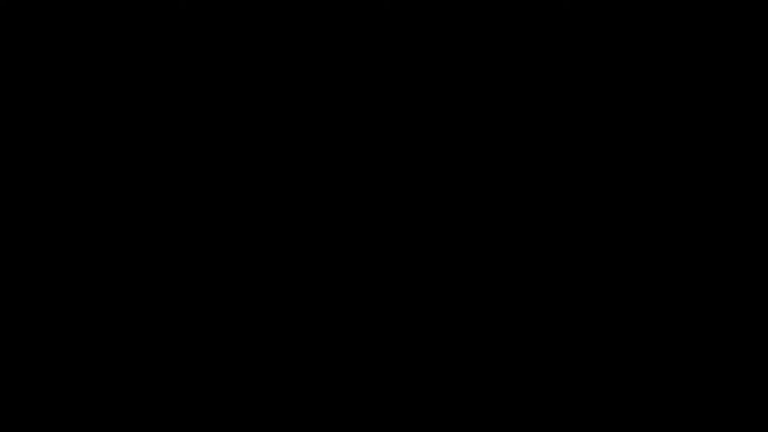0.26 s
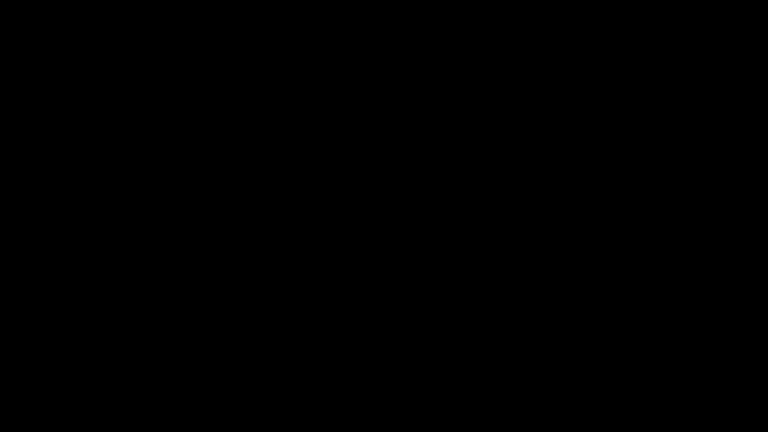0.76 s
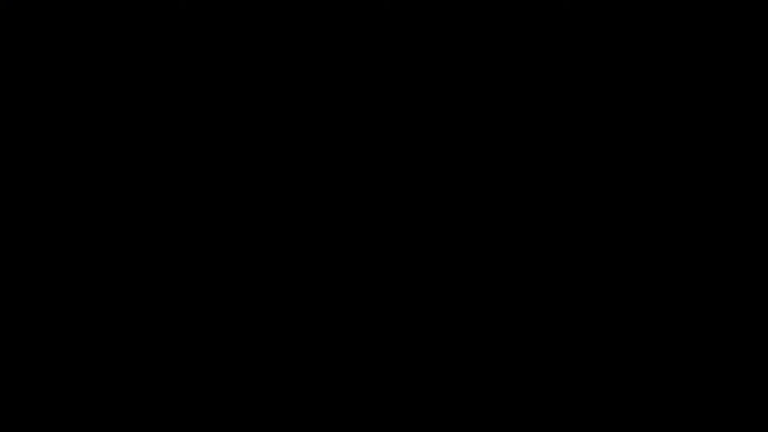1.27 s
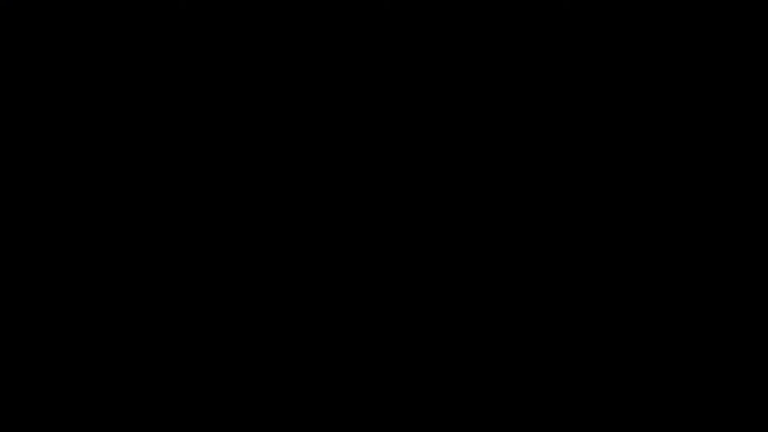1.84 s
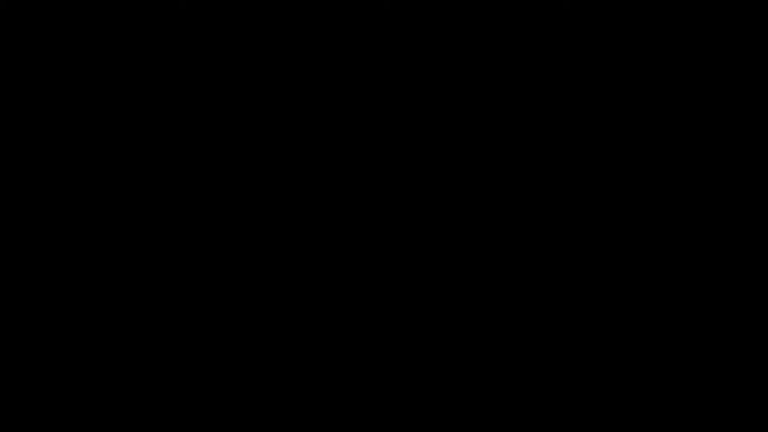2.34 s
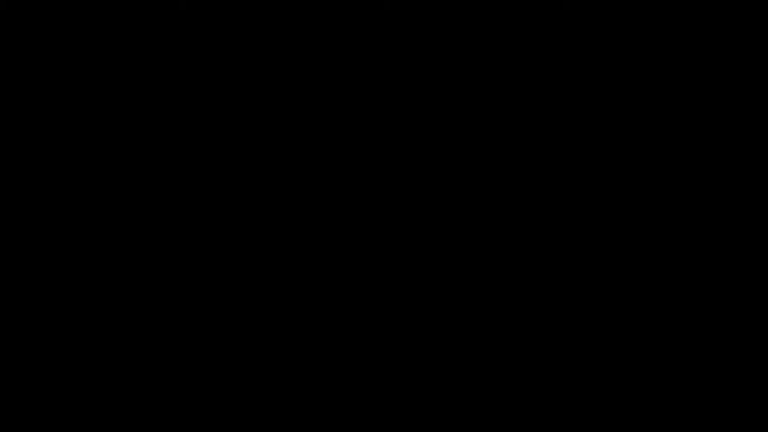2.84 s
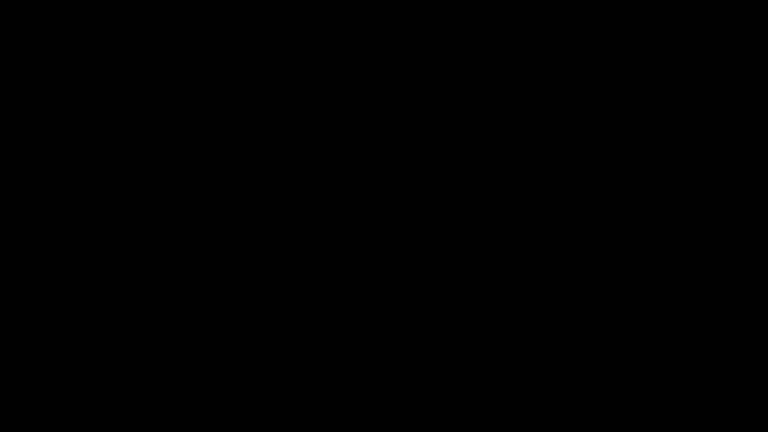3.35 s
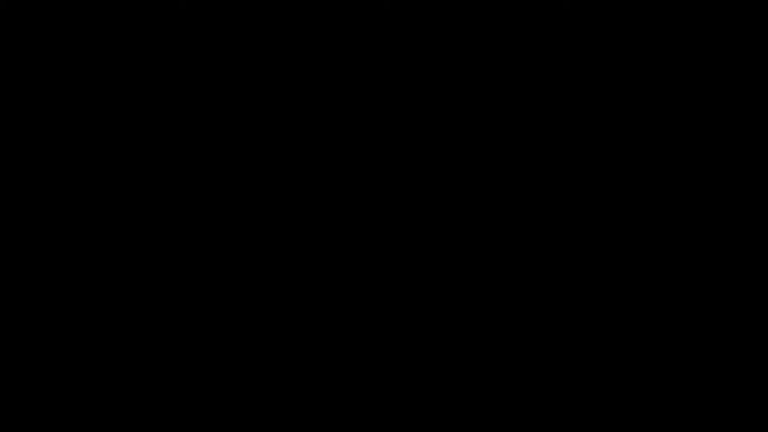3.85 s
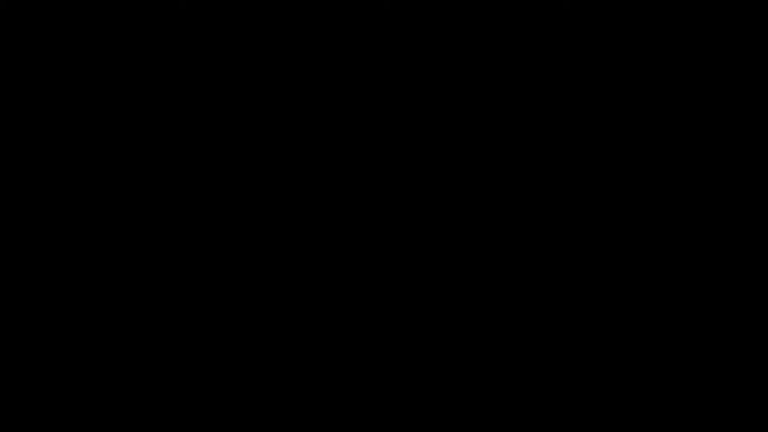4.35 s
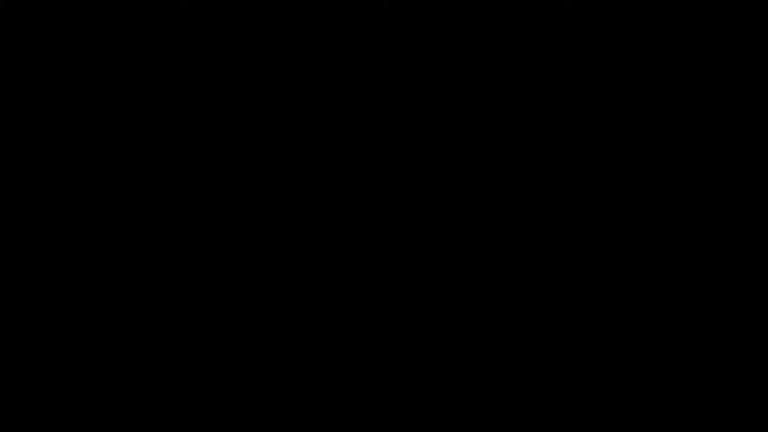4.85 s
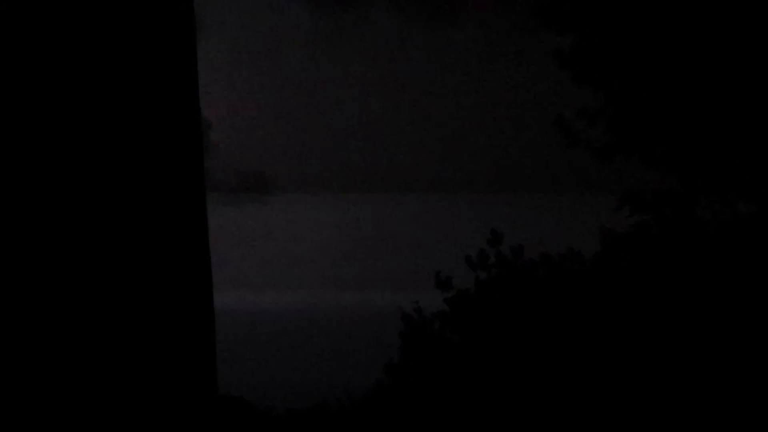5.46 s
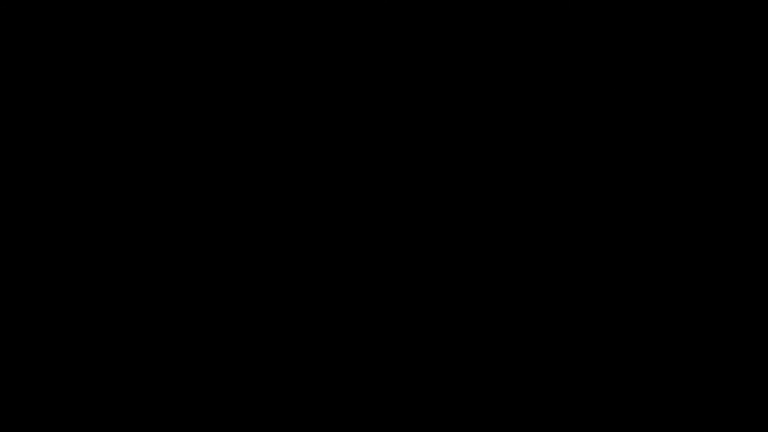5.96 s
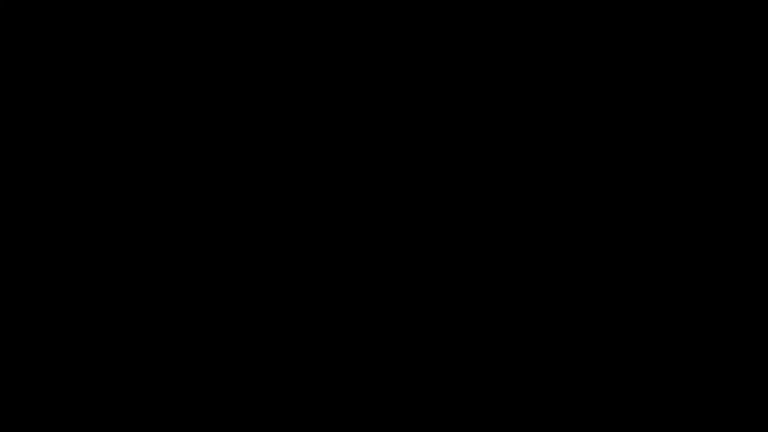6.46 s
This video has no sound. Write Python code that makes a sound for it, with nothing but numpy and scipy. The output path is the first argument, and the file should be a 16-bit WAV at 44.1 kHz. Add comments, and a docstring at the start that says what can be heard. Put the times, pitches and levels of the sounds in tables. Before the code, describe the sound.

Outdoors at night, a dense high cricket chorus rings without pause, weighted to the left. Nearer insects tick rapidly, buzz in short chirps and trill lower in bouts. Distant thunder rolls deep and strong in the first three seconds, then sinks to a faint murmur. Sparse tiny dry ticks sound close to the stereo microphone. Soft air and a high hiss lie behind, the hiss dropping near four seconds.

```python
"""A shrill band of crickets sounds throughout, many stridulating voices merged by scattering foliage.
Nearer insects tick, trill and chirp as gliding tones gated by wing strokes; a lower group swells to two beats.
Far thunder rolls beneath as four bands of noise, each with its own swell and fade.
Small ticks, sums of decaying sines, sound close to the microphone over coloured noise for air and high hiss."""
import sys
import numpy as np
from scipy import signal
from scipy.fft import rfft, irfft, next_fast_len
from scipy.io import wavfile
from scipy.ndimage import map_coordinates

SR = 44100
rng = np.random.default_rng(int(sys.argv[2]) if len(sys.argv) > 2 else 0)


def transcribe(signal):
    """Save signal, clipped to [-1, 1], as a 16-bit WAV file at the path in sys.argv[1]."""
    frames = np.atleast_2d(signal).T
    limited = np.clip(frames, -1, 1)
    pcm = np.round(limited * 32767).astype(np.int16)
    wavfile.write(sys.argv[1], SR, pcm)


N = 295470
TIME = np.arange(N) / SR


def amp(db):
    """Level law: decibels to amplitude gain."""
    return 10 ** (np.asarray(db) / 20)


def unit(x):
    """Normalisation: scale to rms 1."""
    return x / np.sqrt(np.mean(x ** 2) + 1e-20)


def along(points, hz):
    """Log-frequency interpolation of (f/Hz, value) points."""
    f, v = np.transpose(points)
    return np.interp(np.log(hz + 1), np.log(f + 1), v)


def wobble(rate):
    """Random modulation: a smooth curve through normal random knots, rate knots per second."""
    knots = rng.standard_normal(int(N * rate / SR) + 4)
    coarse = TIME[::64]
    return np.interp(TIME, coarse, map_coordinates(knots, [coarse * rate]))


def filtered(x, response):
    """Linear filtering: the spectrum of x times a response of frequency."""
    m = next_fast_len(N + SR // 4)
    spectrum = rfft(x, m) * response(np.fft.rfftfreq(m, 1 / SR))
    return irfft(spectrum, m)[..., :N]


def coloured(x, colour):
    """Spectral shaping by (f/Hz, level/dB) points, returned at rms 1."""
    return unit(filtered(x, lambda hz: amp(along(colour, hz))))


def pan(side_db):
    """Interaural level difference: left and right gains, side_db being left minus right."""
    return amp(np.array([[.5], [-.5]]) * side_db)


def sided(x, sides):
    """Interaural level difference that varies with frequency."""
    return filtered(x, lambda hz: pan(along(sides, hz)))


def noise(apart=1):
    """Interaural coherence: stereo noise, from identical ears (0) to unrelated ears (1)."""
    mid, side = rng.standard_normal((2, N))
    return unit(np.array([mid + apart * side, mid - apart * side]))


def foliage(x, t60, wet_db, lag_s=0.0002628):
    """Scattering: direct sound, later at the right ear, plus a decaying tail different at each ear."""
    t = TIME[:SR // 2]
    tail = rng.standard_normal((2, len(t))) * amp(-60 * t / t60)
    tail *= amp(wet_db) / np.linalg.norm(tail[0])
    # the direct sound: an impulse in each ear
    tail[0, 0] += 1
    tail[1, round(lag_s * SR)] += 1
    heard = signal.fftconvolve(x[None], tail, axes=1)[:, :N]
    return heard / np.sqrt(1 + amp(wet_db) ** 2)


def wings(strokes, share, pitch_hz, fall_hz):
    """Stridulation: each closing stroke drags scraper over file, a tone that swells and sags as the wing slows."""
    closing = np.minimum(strokes % 1 / np.clip(share, .05, 1), 1)  # 0 to 1, then silent until the next
    turns = np.cumsum(pitch_hz - fall_hz * closing ** 2) / SR
    return unit(np.sqrt(closing * (1 - closing)) * np.sin(2 * np.pi * turns))


# spectrum of the merged crickets: f/Hz, relative level/dB (per Hz)
CROWD_SPECTRUM = [(4300, -56), (4750, -24), (5250, -18.5), (5600, -6), (5850, -3.5), (6030, -3),
                  (6220, -5.5), (6420, -10), (6750, -14.5), (6950, -27), (7120, -35.5), (7600, -31),
                  (8400, -70)]
# balance of the crowd: f/Hz, left minus right level/dB
CROWD_BALANCE = [(5000, 5), (5600, 6.5), (6000, 11.5), (6400, 3.5), (6800, 8), (7300, 6)]


def crowd(count=48, level_db=-25.0, wet_db=4, flutter_db=2):
    """Incoherent superposition: dozens of crickets, each with its own pitch, stroke rate and scattering."""
    field = np.zeros((2, N))
    for pitch_hz in np.linspace(5050, 7350, count):
        strokes = rng.uniform(30, 95) * TIME + rng.random() + .3 * wobble(7)
        flutter = amp(flutter_db * wobble(12))
        song = flutter * wings(strokes, .55, pitch_hz + 55 * wobble(60), 400)
        field += [unit(ear) for ear in foliage(song, 0.047, wet_db)]
    return amp(level_db) * sided(coloured(field, CROWD_SPECTRUM), CROWD_BALANCE)


# near crickets with slow, even strokes: first stroke t/s, stroke rate/(1/s), closing share of a stroke (0-1),
# pitch f/Hz, fall f/Hz, mean level/dB, left minus right level/dB
TICKING_CRICKETS = [(.049, 14.41, 0.3, 6960, 200, -47.5, 10.5), (.046, 14.93, .42, 6850, 400, -39, -0.5)]


def tickers():
    """Beating of two stroke rates: near crickets, one left and one near the middle, drift in and out of step."""
    out = np.zeros((2, N))
    for start, rate, share, pitch_hz, fall_hz, db, side_db in TICKING_CRICKETS:
        strokes = (TIME - start) * rate + 0.015 * wobble(2)
        song = wings(strokes, share, pitch_hz + 18 * wobble(15), fall_hz)
        out += amp(db + wobble(6)) * pan(side_db) * unit(foliage(song, t60=0.22, wet_db=-5.0))
    return out


# bouts of trilling: start t/s, end t/s, level/dB before the surge
TRILL_BOUTS = [(-.8, .62, -51.5), (1.36, 3.39, -48.5), (4.4, 6.9, -46.5)]
BOUT_RISE_S, BOUT_FALL_S = .2, .08
SURGE_AFTER_S, SURGE_WIDTH_S, SURGE_DB = 0.78, 0.21, 3.5  # each bout is loudest soon after it starts


def tree_cricket():
    """Amplitude modulation by quick, sagging strokes: a low trill in bouts that surge early, then settle."""
    rate, share, pitch_hz, fall_hz = 66.8, .88, 2768, 235  # rate in strokes per second
    strokes = rate * TIME + 0.11 * wobble(2.6)
    song = wings(strokes, share, pitch_hz + 4 * wobble(3) + 8 * wobble(70), fall_hz)
    effort = np.zeros(N)
    for start, end, db in TRILL_BOUTS:
        since = TIME - start
        gate = np.clip(np.minimum(since / BOUT_RISE_S, (end - TIME) / BOUT_FALL_S), 0, 1)
        surge_db = SURGE_DB * np.exp(-((since - SURGE_AFTER_S) / SURGE_WIDTH_S) ** 2)
        effort += gate * amp(db + surge_db)
    return effort * amp(.7 * wobble(9)) * pan(5) * unit(foliage(song, t60=.1, wet_db=-8))


# buzzy chirps: start t/s, length t/s, pitch f/Hz, level/dB at the middle
BUZZY_CHIRPS = [(0, .14, 5100, -39), (.72, .3, 5180, -41), (1.61, .29, 5120, -36), (2.56, .28, 5110, -38.5),
                (2.95, .27, 5140, -40), (4.11, .29, 4550, -52), (4.19, .23, 4950, -40.5),
                (4.82, .25, 4810, -44.5), (4.89, .2, 4900, -43), (5.4, .29, 5010, -39.5),
                (5.62, .2, 5080, -40.5), (5.93, .28, 4950, -41), (6.0, .24, 5080, -39.5),
                (6.2, .26, 5110, -38), (6.61, .2, 5170, -38)]


def chirpers():
    """Frequency glide: short buzzes of fast strokes rise a little in pitch as the wings get going."""
    out = np.zeros((2, N))
    for start, length, pitch_hz, db in BUZZY_CHIRPS:
        progress = np.clip((TIME - start) / length, 0, 1)
        glide_hz = pitch_hz + 50 * (progress - .3) + 12 * wobble(90)
        buzz = wings(rng.uniform(40, 60) * TIME, .85, glide_hz, 80)
        swell = (4 * progress * (1 - progress)) ** .35
        out += amp(db) * swell * unit(foliage(buzz, t60=.1, wet_db=-4))
    return pan(5) * out


# spectrum of the low group: f/Hz, relative level/dB (per Hz)
LOW_SPECTRUM = [(2600, -80.5), (3250, -15), (3550, -4), (3800, 0.5), (3980, 0.5), (4120, -12.5),
                (4700, -78)]
# two parties, each chirping to its own beat: chirp rate/(1/s), level/dB at the in-step moment
PARTY_BEATS = [(3.583, -47.5), (3.84, -51)]
IN_STEP_S = 2.245  # a moment when both beats fall together
BEAT_SHARPNESS, LOW_GROWTH_DB_PER_S = 1.73, 0.57


def low_group(count=14, steady_db=-57):
    """Beating of two rhythms: far, lower crickets chirp nearly four times a second, in and out of step."""
    field = np.zeros((2, N))
    for pitch_hz in np.linspace(3300, 4200, count):
        strokes = rng.uniform(50, 90) * TIME + .3 * wobble(8)
        song = wings(strokes, .6, pitch_hz + 50 * wobble(90) + 40 * wobble(5), 200)
        # each member's loudness wanders at random
        field += amp(2.1 * wobble(3.99)) * unit(foliage(song, t60=0.083, wet_db=5.5))
    since = TIME - IN_STEP_S
    power = amp(steady_db) ** 2
    for rate, db in PARTY_BEATS:
        power = power + amp(db) ** 2 * np.exp(BEAT_SHARPNESS * (np.cos(2 * np.pi * rate * since) - 1))
    level = amp(LOW_GROWTH_DB_PER_S * since) * np.sqrt(power)
    return level * pan(8.9) * coloured(field, LOW_SPECTRUM)


# peals of far thunder: crest t/s, hold t/s, then shudder, boom, growl and roar level/dB
THUNDER_PEALS = [(-.1, 0.17, -53, -23, -26.5, -48.5), (0.409, 0.086, -28, -14, -21, -52),
                 (.64, 0.22, -39, -22.5, -26, -52.5), (1.444, 0.088, -37, -18.5, -27, -50.5),
                 (1.64, .08, -30, -21.5, -21.5, -53.5), (1.834, 0.1, -38, -20, -32, -65),
                 (2.2, 0.33, -40, -36.5, -31, -53.5), (2.676, 0.23, -31, -26.5, -32, -56),
                 (3.148, 0.43, -34.5, -30, -29.5, -56.5), (3.87, 0.3, -42, -31, -34.5, -56.5),
                 (4.303, 0.18, -38, -35.5, -38, -59), (5.29, 0.065, -54, -49, -41.5, -50),
                 (5.78, 0.023, -54, -44, -40, -46), (6.2, 0.046, -54, -48, -34, -43),
                 (6.48, .3, -54, -40, -41, -54)]
# how each register swells and dies, by name: attack t/s, fade rate/(dB/s), murmur level/dB between peals
THUNDER_REGISTERS = {"shudder": (0.15, 58, -56), "boom": (0.053, 47, -43), "growl": (0.15, 27, -41.5),
                     "roar": (0.16, 16.5, -57.5)}


def peals(register):
    """Power summation: each peal of one register rises, holds and fades, piling on the others."""
    attack_s, fade_db_per_s, murmur_db = THUNDER_REGISTERS[register]
    power = amp(murmur_db) ** 2
    for crest, hold, *levels in THUNDER_PEALS:
        db = dict(zip(THUNDER_REGISTERS, levels))[register]
        rise = np.clip(1 + (TIME - crest) / attack_s, 0, 1)
        fading_s = np.maximum(TIME - crest - hold, 0)
        power = power + (rise * amp(db - fade_db_per_s * fading_s)) ** 2
    return np.sqrt(power)


def roll(colour, apart, steadiness):
    """Band-limited noise as a rumble of overlapping far claps, its slow swings evened out by steadiness (0-1)."""
    x = coloured(noise(apart), colour)
    power = signal.fftconvolve(np.mean(x ** 2, axis=0), np.hanning(SR // 8), "same")
    return unit(x / (np.abs(power) + 1e-6) ** (steadiness / 2))


# spectra of the four registers, lowest first: f/Hz, relative level/dB (per Hz)
SHUDDER_SPECTRUM = [(12, -50), (23, -14.5), (32, 21), (45, 12), (55, 27), (75, -47), (200, -120)]
BOOM_SPECTRUM = [(20, -49), (55, -1.5), (68, -1.5), (85, 6), (112, 2), (138, -14), (190, -71), (500, -120)]
GROWL_SPECTRUM = [(60, -72), (115, 0), (152, -3.5), (185, -4.5), (228, 3), (290, -4), (380, -10.5),
                  (480, -22.5), (700, -46), (1500, -120)]
ROAR_SPECTRUM = [(80, -39.5), (200, -20), (400, 1.5), (620, -0.5), (850, -10), (1200, -26), (4000, -120)]
BOOM_LUMP_DB, LUMPS_PER_S = 1.5, 16  # the boom arrives in uneven lumps


def thunder():
    """Propagation loss: distance leaves a shudder, a deep boom, a growl above it and a thin roar."""
    shudder = peals("shudder") * pan(1.1) * roll(SHUDDER_SPECTRUM, apart=.06, steadiness=1.0)
    lumps = amp(BOOM_LUMP_DB * wobble(LUMPS_PER_S))
    boom = peals("boom") * lumps * pan(0.97) * roll(BOOM_SPECTRUM, apart=0.077, steadiness=1.0)
    growl = peals("growl") * pan(2.74) * roll(GROWL_SPECTRUM, apart=0.26, steadiness=0.46)
    roar = peals("roar") * pan(1.8) * roll(ROAR_SPECTRUM, apart=0.46, steadiness=0.28)
    return shudder + boom + growl + roar


# small close ticks: t/s, knock f/Hz, knock level/dB, snap level/dB, left minus right level/dB
CLOSE_TICKS = [(0.558, 2230, -35, -28, -14), (0.7796, 1720, -35, -33, -9), (1.042, 1340, -27.5, -21, -8),
               (3.523, 1410, -28, -40, 8), (3.924, 1550, -34.5, -44, 4), (6.0837, 1670, -31.5, -23.5, -12),
               (6.378, 1980, -32.5, -47.5, 6.5), (6.4951, 1710, -41, -25, -7)]
# partials of the bright snap: f/Hz, level/dB relative to the snap level, 60 dB decay time t/s
SNAP_PARTIALS = [(3380, -23, 0.0029), (6000, 4, 0.0023), (8600, -1.5, 0.0027), (10900, -9, .002)]


def ring(age, hz, db, t60):
    """Damped oscillation: a sine that loses 60 dB in t60 seconds."""
    return amp(db - 60 * age / t60) * np.sin(2 * np.pi * hz * age)


def ticks():
    """Modal decay: tiny dry knocks, each with a bright snap of several partials, strong or faint."""
    out = np.zeros((2, N))
    for start, knock_hz, knock_db, snap_db, side_db in CLOSE_TICKS:
        age = np.clip(TIME - start, 0, .1)  # silent before the start, died away by the end
        knock = ring(age, knock_hz, knock_db, t60=.007)
        snap = sum(ring(age, hz, db + snap_db, t60) for hz, db, t60 in SNAP_PARTIALS)
        out += pan(side_db) * (knock + snap)
    return out


# spectra of night air and high hiss: f/Hz, relative level/dB (per Hz)
AIR_SPECTRUM = [(40, -6), (400, -4.5), (950, -4.5), (1500, -4), (2300, 1.5), (3100, -2), (4300, -1.5),
                (7400, -0.5), (8700, -12), (14500, -7)]
HISS_SPECTRUM = [(3000, -46.5), (7000, -15), (9300, -5.5), (10500, -7), (11700, 3), (12700, -1), (14400, 5)]
# their balances: f/Hz, left minus right level/dB
AIR_BALANCE = [(500, 1), (1300, 1.5), (2400, 2.5), (3400, 6.5), (4300, 6.5), (7400, 1), (8700, -15),
               (14000, -2)]
HISS_BALANCE = [(8500, -13.5), (10200, -18), (11700, 0), (14400, 0)]
# course of the high hiss: t/s, level/dB before random variation and balance
HISS_LEVEL = [(0, -42), (3.8, -42.5), (3.92, -55), (6.7, -64)]


def background(variation_db=1.1):
    """Stationary and modulated noise: soft night air and an unsteady high hiss, dropping sharply near 3.9 s."""
    air = amp(-43) * sided(coloured(noise(), AIR_SPECTRUM), AIR_BALANCE)
    hiss_db = np.interp(TIME, *np.transpose(HISS_LEVEL)) + variation_db * wobble(20)
    hiss = amp(hiss_db) * sided(coloured(noise(), HISS_SPECTRUM), HISS_BALANCE)
    return air + hiss


def scene():
    """Linear superposition: insects, far thunder, close ticks and the background."""
    insects = crowd() + tickers() + tree_cricket() + chirpers() + low_group()
    return insects + thunder() + ticks() + background()


def record(dry):
    """Band limiting: the recorder keeps nothing from 14650 Hz up."""
    return filtered(dry, lambda hz: hz < 14650)


dry = scene()
out = record(dry)
transcribe(out)
```